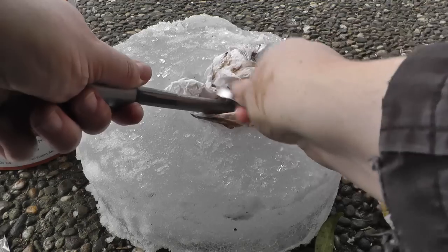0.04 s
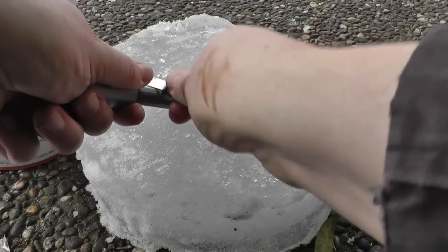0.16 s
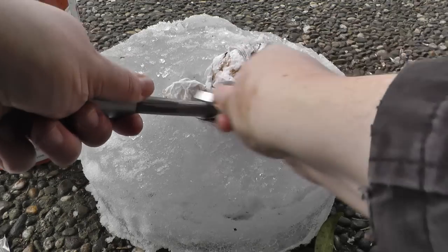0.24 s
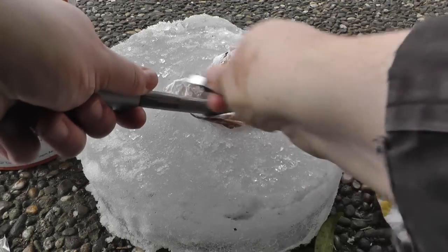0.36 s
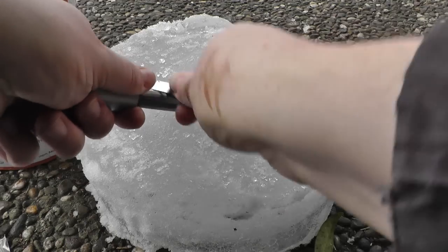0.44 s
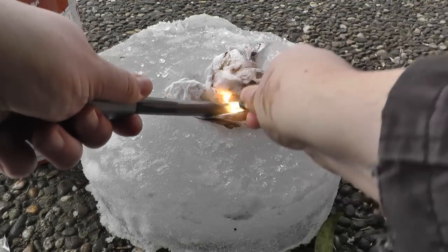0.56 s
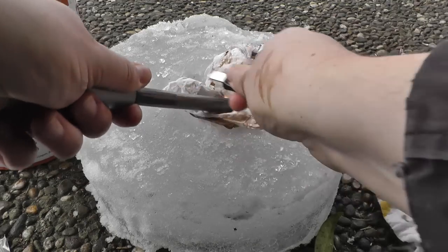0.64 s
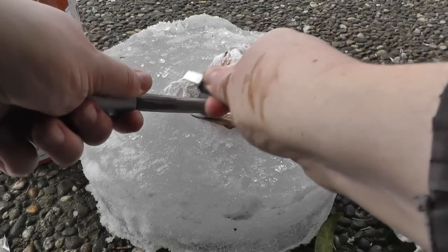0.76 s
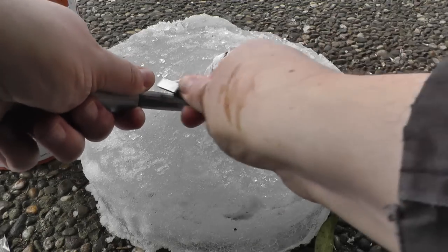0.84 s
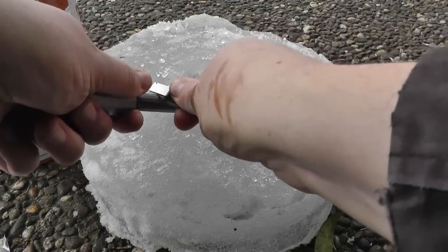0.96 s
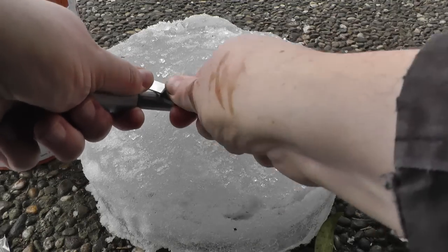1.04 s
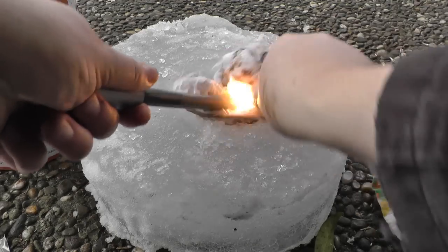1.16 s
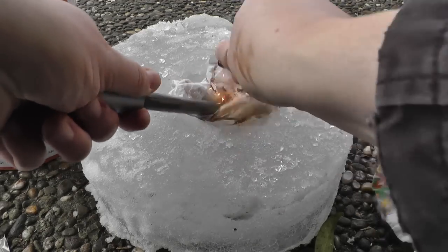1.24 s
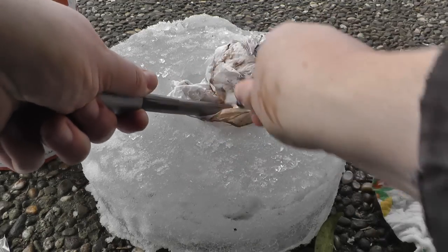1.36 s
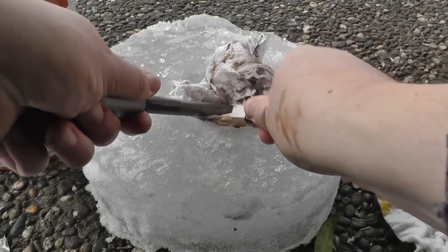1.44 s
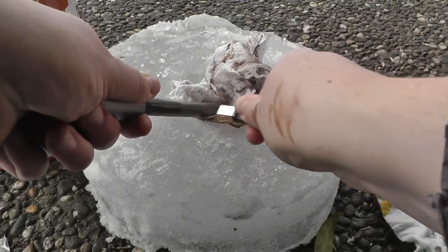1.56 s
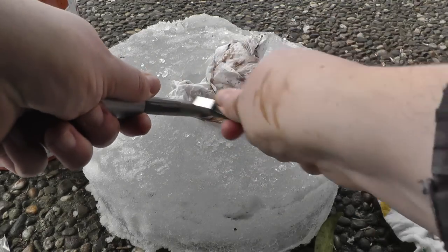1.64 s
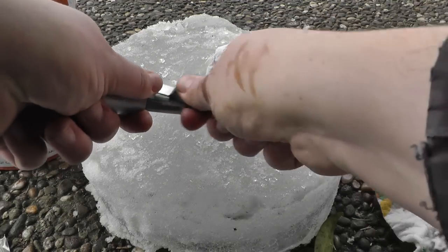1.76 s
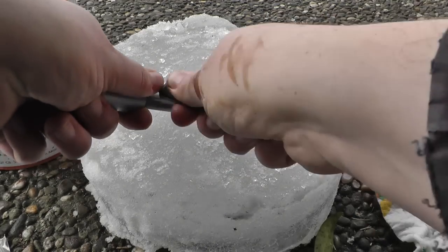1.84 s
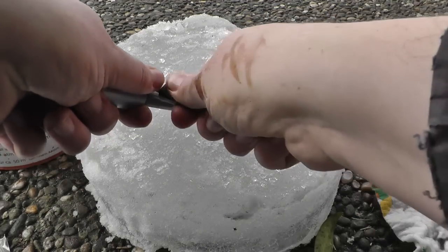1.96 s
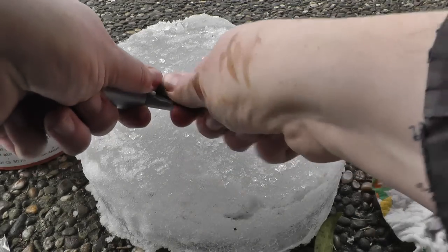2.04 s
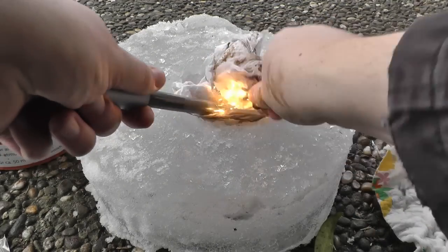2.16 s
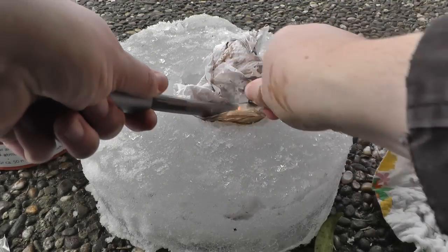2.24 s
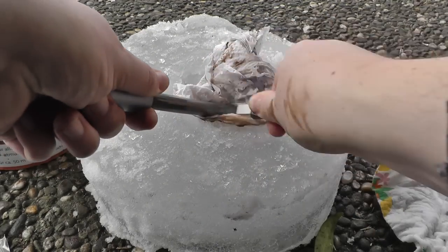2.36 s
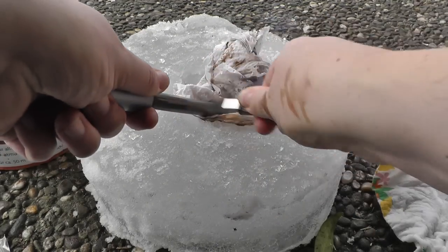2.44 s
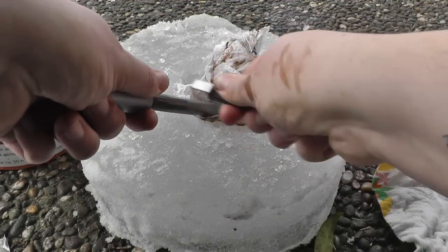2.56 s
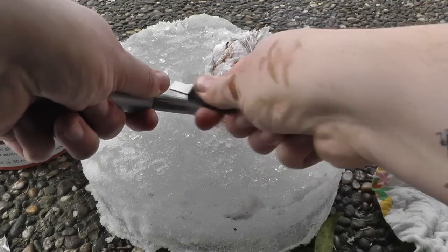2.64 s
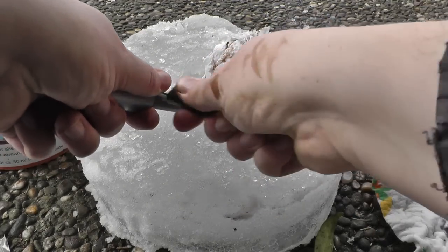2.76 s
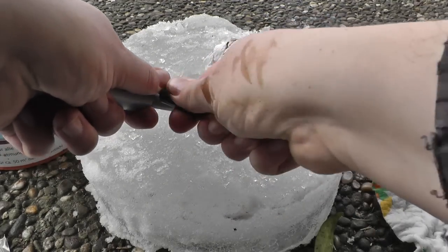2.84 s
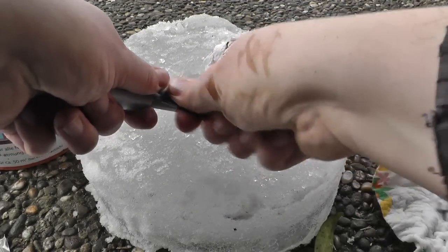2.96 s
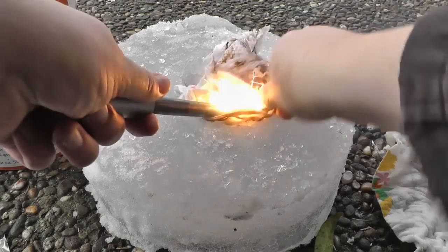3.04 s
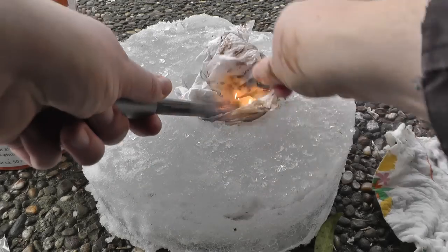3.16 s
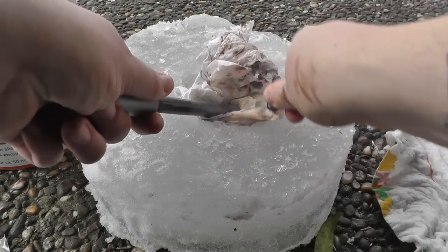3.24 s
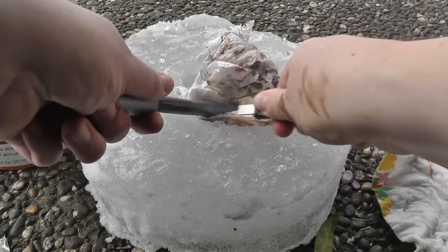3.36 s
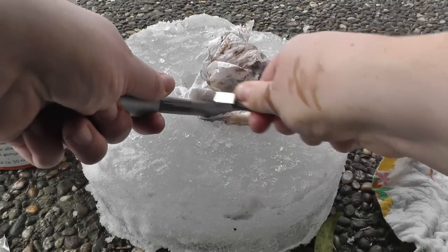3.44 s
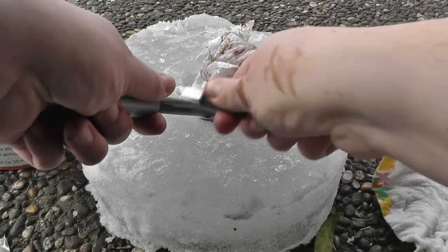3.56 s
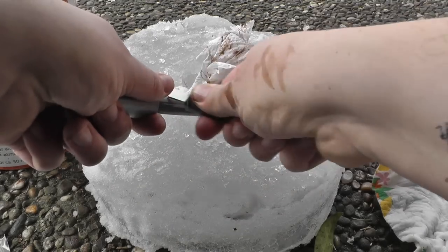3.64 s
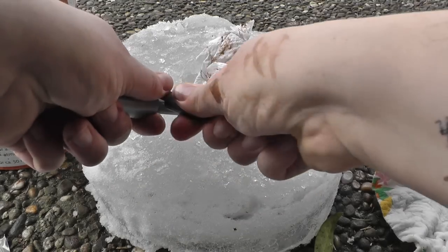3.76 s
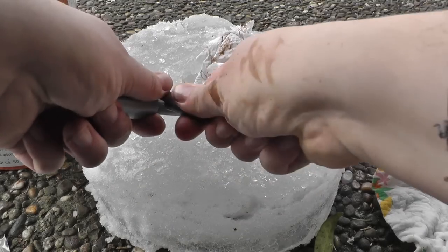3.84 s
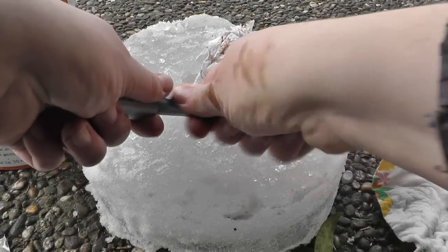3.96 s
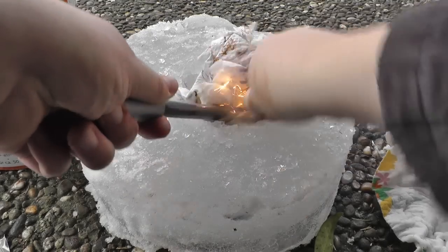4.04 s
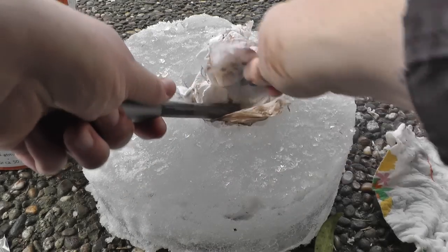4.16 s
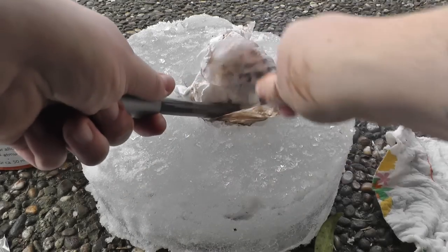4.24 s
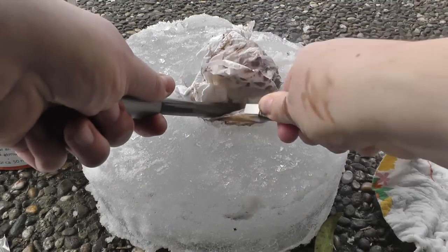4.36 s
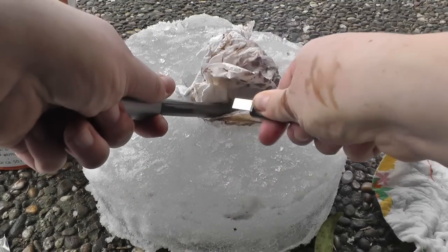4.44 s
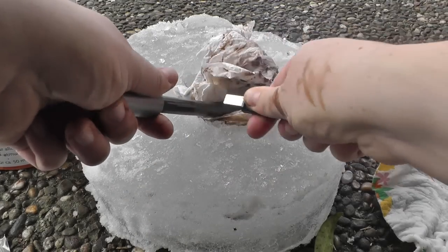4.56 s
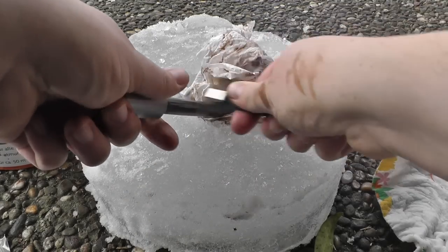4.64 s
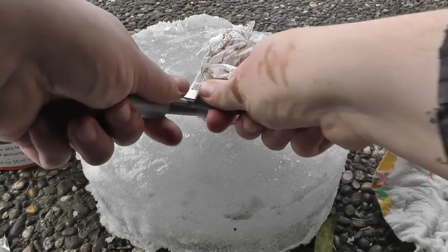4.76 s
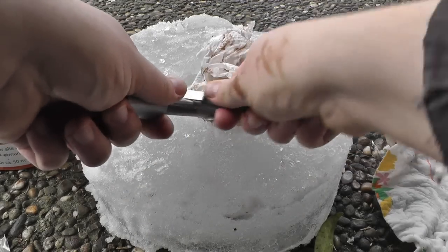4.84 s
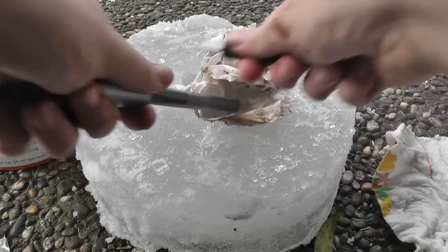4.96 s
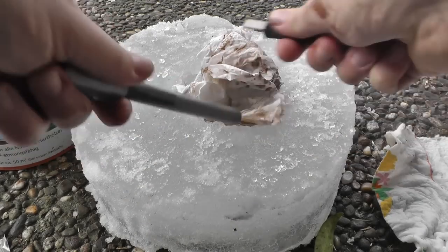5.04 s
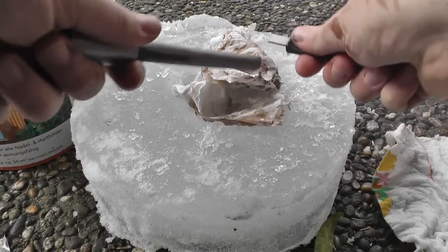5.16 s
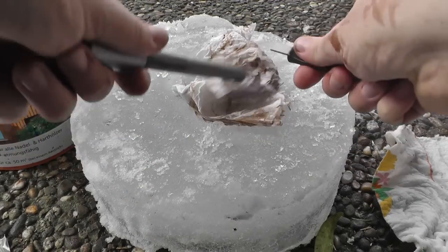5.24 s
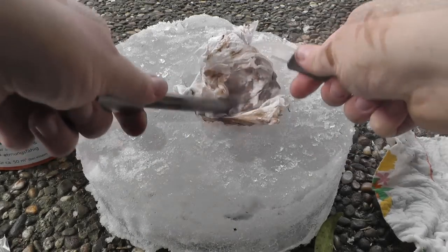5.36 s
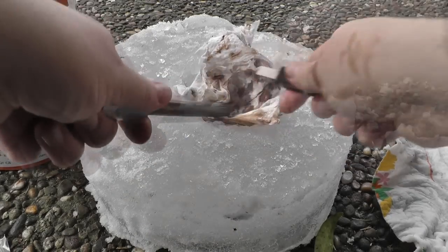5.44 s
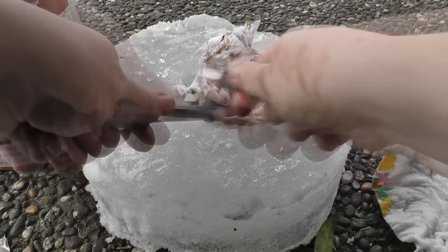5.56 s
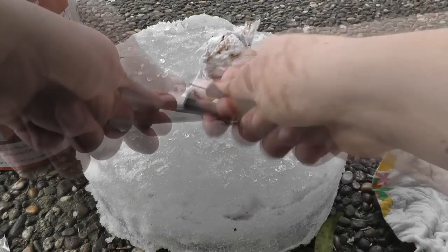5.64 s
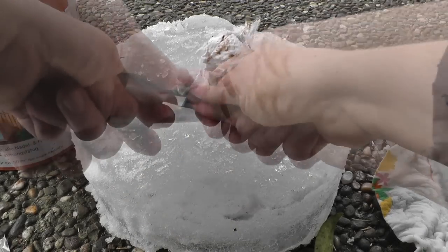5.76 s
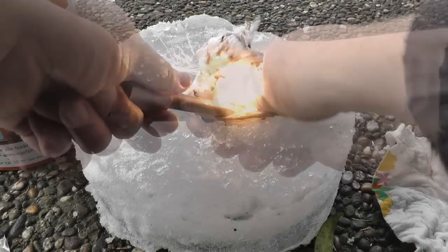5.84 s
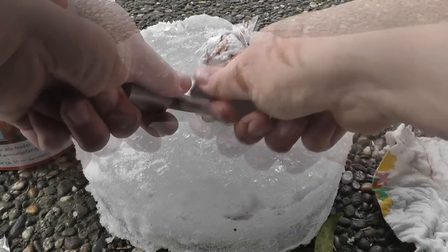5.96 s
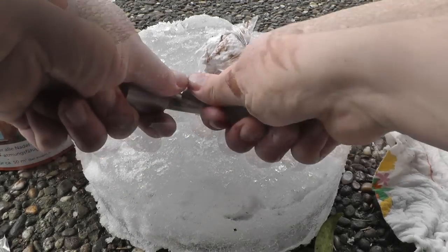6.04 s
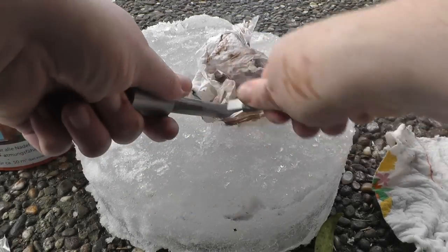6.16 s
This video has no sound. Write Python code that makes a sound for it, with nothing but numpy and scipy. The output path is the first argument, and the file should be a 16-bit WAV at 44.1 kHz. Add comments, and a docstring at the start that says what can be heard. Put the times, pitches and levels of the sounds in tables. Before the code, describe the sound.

Steel striker rasps along a fire-steel rod close by: three light scrapes, then four harsh ones with spark bursts, then a dull knock and sleeve rustle.

```python
"""Outdoors and close by, a steel striker is drawn along a fire-steel rod over tinder.
Friction makes the rasp: three light strokes, then four hard ones, the first followed by a faint second
contact at the rod's tip. Contacts tick and ring the steel as damped modes, and the skating edge squeals by
stick-slip. Shavings flare as filtered noise full of bursts, and sparks pop as impulses. Late on, the rod's
tip knocks on the block below; sleeves rustle and swish as shaped noise over a low outdoor wash."""
import sys
import numpy as np
from scipy import signal
from scipy.fft import rfft, irfft
from scipy.io import wavfile
from scipy.ndimage import uniform_filter1d

SR = 44100
rng = np.random.default_rng(int(sys.argv[2]) if len(sys.argv) > 2 else 0)


def log_audio(samples):
    """Write samples as a 16-bit WAV file to the path given in sys.argv[1]."""
    # one column per channel
    frames = np.atleast_2d(samples).T
    # limit to full scale, then quantise
    limited = np.clip(frames, -1, 1)
    pcm = np.round(limited * 32767).astype(np.int16)
    wavfile.write(sys.argv[1], SR, pcm)


N = 273420
TIME = np.arange(N) / SR


def amp(db):
    """Decibel law: level to amplitude gain."""
    return 10 ** (np.asarray(db) / 20)


def unit(x):
    """Power normalization: scales to rms 1."""
    return x / np.sqrt(np.mean(x ** 2) + 1e-20)


def peaked(x, db):
    """Peak normalization: scales the largest excursion to a level."""
    return amp(db) * x / abs(x).max()


def read(points, hz):
    """Interpolation of a (frequency_hz, value) table on a logarithmic frequency axis."""
    table_hz, value = np.transpose(points)
    return np.interp(np.log(hz + 1), np.log(table_hz + 1), value)


def add(mix, start_s, sound):
    """Superposition: adds a sound into the mix from a start time."""
    part = mix[max(round(start_s * SR), 0):][:len(sound)]
    part += sound[:len(part)]


def level(rows, shape):
    """Superposed envelopes: each row starts one of the given shape, cut off after 1 s."""
    out = np.zeros(N)
    for start_s, *settings in rows:
        add(out, start_s, shape(TIME[:SR], *settings))
    return out


def band(x, lo_hz, hi_hz):
    """Causal band-pass filtering."""
    edges_hz = [lo_hz, min(hi_hz, SR / 2 - 1)]
    return signal.sosfilt(signal.butter(2, edges_hz, "band", fs=SR, output="sos"), x)


def unit_in(x, lo_hz, hi_hz):
    """Band-power normalization: scales so that one band has rms 1."""
    return x / band(x, lo_hz, hi_hz).std()


def colour(x, spectrum, size=2048):
    """Minimum-phase filtering: energy comes as early as possible, so clicks keep sharp fronts."""
    hz = abs(np.fft.fftfreq(size, 1 / SR))
    log_gain = np.log(amp(read(spectrum, hz)))
    kernel = np.fft.ifft(np.exp(np.conj(signal.hilbert(log_gain)))).real
    return signal.oaconvolve(x, kernel)[:len(x)]


def wander(rate_hz):
    """Low-passed noise: a smooth random modulator of rms 1."""
    hz = np.fft.rfftfreq(N, 1 / SR)
    return unit(irfft(rfft(rng.standard_normal(N)) / (1 + (hz / rate_hz) ** 4), N))


def grains(per_s, spread_db):
    """Random impulse train (shot noise): mostly small clicks, a few large."""
    size = amp(spread_db * np.minimum(rng.exponential(1, N), 4))
    sign = rng.choice([-1, 1], N)
    return unit(size * sign * (rng.random(N) < per_s / SR))


def ring(modes, size=4096):
    """Modal superposition: a struck body responds as a sum of decaying sines."""
    t = TIME[:size]
    return sum(amp(db - 60 * t / t60) * np.sin(2 * np.pi * hz * t) for hz, db, t60 in modes)


def patchy(x, depth_db, size=256):
    """Time-varying spectrum: other frequencies stand out every few ms, as chips of different size break off."""
    spectra = signal.stft(x, nperseg=size)[2]
    patches = uniform_filter1d(rng.standard_normal(spectra.shape), 4, axis=0)  # over frequency
    patches = uniform_filter1d(patches, 3, axis=1)  # over time
    return signal.istft(spectra * amp(depth_db * unit(patches)), nperseg=size)[1][:N]


CONTACT_S = 0.0034  # the edge takes this long to grip, and shavings to catch


def press(t, build_s, hold_s, db, from_db, fade_db_per_s):
    """Contact envelope: grips, builds from from_db relative to db, holds, and decays exponentially."""
    build = from_db * np.maximum(1 - t / build_s, 0)
    fade = fade_db_per_s * np.maximum(t - build_s - hold_s, 0)
    return np.minimum(t / CONTACT_S, 1) * amp(db + build - fade)


# modes of rod and striker, damped by the hands: frequency_hz, level_db, t60_s
STEEL_MODES = [(1268, -18, 0.026), (2520, -53, 0.0084), (2890, -11.5, 0.014), (3450, -5, 0.014),
               (5000, -1, 0.0062), (6320, -17, 0.018), (6585, 5.5, 0.0085), (7055, -1.5, 0.011),
               (7420, -10, 0.012), (9600, -30, 0.0064)]


def rasp(pressure, spectrum, gain_db, ring_db, judder_db, patch_db, spread_db):
    """Friction noise: uneven slips tear tiny chips off the rod, sound directly and ring the steel."""
    chips = patchy(grains(11000, spread_db), patch_db) * amp(judder_db * wander(240))
    steel = signal.oaconvolve(chips, ring(STEEL_MODES))[:N]
    sound = unit(colour(chips, spectrum)) + amp(ring_db) * unit(steel)
    return amp(gain_db) * pressure * unit_in(sound, 5000, 10000)


# light strokes along the rod: start_s, build_s, hold_s, level_db (before the rasp's gain)
LIGHT_STROKES = [(0.003, 0.038, 0.079, -32.5), (.287, 0.036, 0.088, -32), (.567, 0.067, 0.049, -29)]
# spectrum of the light rasp, also of tick cracks and bite grit: frequency_hz, level_db
RASP_SPECTRUM = [(100, -28), (600, -19), (1150, -12.5), (2250, -18), (2600, -2.5), (3300, -4.5), (3600, -9),
                 (5100, -9), (5450, 1.5), (6300, -3), (7800, -2), (9000, -10.5), (10200, -10.5),
                 (11000, -19.5)]


def light_strokes():
    """Sustained friction: pressure builds and is held until the edge lifts."""
    def stroke(t, build_s, hold_s, db):
        """Pressure envelope: the first touch is 13 dB below full pressure."""
        return press(t, build_s, hold_s, db, from_db=-13, fade_db_per_s=563)

    return rasp(level(LIGHT_STROKES, stroke), RASP_SPECTRUM,
                gain_db=-2.0, ring_db=-8.0, judder_db=2.5, patch_db=3.0, spread_db=4.0)


# four hard strokes down the rod; the second row is the first stroke's faint second contact at the tip:
# start_s, build_s, level_db (before the rasp's gain), fade_db_per_s
HARD_STROKES = [(1.206, 0.035, -22.5, 328), (1.31, 0.034, -34.5, 802), (2.18, 0.046, -24, 350),
                (3.097, 0.032, -22.5, 320), (4.089, .038, -23.5, 560)]
# spectrum of the hard rasp, also of slide grit and knock clicks: frequency_hz, level_db
GOUGE_SPECTRUM = [(100, -15), (700, -18), (2100, -13.5), (3100, 2), (3900, -6), (5000, -2), (5800, -1),
                  (7500, -1), (9000, -7.5), (10200, -9.5), (11500, -17), (16000, -14)]


def hard_strokes():
    """Abrasive friction: at each contact the edge digs in fast and runs off the rod at once."""
    def contact(t, build_s, db, fade_db_per_s):
        """Pressure envelope: the first touch is 13.5 dB below full pressure."""
        return press(t, build_s, 0, db, -13.5, fade_db_per_s)

    return rasp(level(HARD_STROKES, contact), GOUGE_SPECTRUM,
                gain_db=-2.0, ring_db=-13.5, judder_db=0.7, patch_db=2.5, spread_db=4.0)


# the striker slides lightly into place: start_s, length_s, level_db (before gain_db), change_db along the slide
SLIDES = [(.152, .008, -49, 2), (.44, 0.0082, -47, -2), (.778, 0.022, -43.5, 2), (1.01, .055, -55, -8),
          (1.135, 0.037, -49.5, 6), (1.563, 0.058, -56, -1), (1.905, 0.01, -46, -11), (2.0, .05, -54, -9),
          (2.138, 0.013, -48.5, -5), (2.838, 0.057, -51.5, 5), (2.902, 0.01, -44.5, 3),
          (3.72, 0.08, -49.5, -6), (3.862, 0.0054, -45.5, 9), (4.558, 0.02, -51, -2),
          (4.9, 0.075, -52.5, 1), (5.788, 0.065, -47.5, -8), (5.918, 0.044, -45, 7.5)]


def slides(gain_db=-1, grit_db=-3, judder_db=2.8, low_db=5):
    """Lightly loaded resonator: barely pressed, the striker rings freely, above all in its low modes."""
    def touch_level(t, length_s, db, change_db):
        """Linear decibel ramp: the touch grows or eases steadily, then lifts."""
        return press(t, length_s, 0, db + change_db / 2, -change_db, fade_db_per_s=750)

    touch = grains(11000, 1.4) * amp(judder_db * wander(170))
    weight = [(3400, low_db), (5800, 0)]  # frequency_hz, level_db
    free_modes = [(hz, db + read(weight, hz), t60) for hz, db, t60 in STEEL_MODES]
    steel = signal.oaconvolve(touch, ring(free_modes))[:N]
    grit = unit(colour(touch, GOUGE_SPECTRUM))
    return amp(gain_db) * level(SLIDES, touch_level) * unit(unit(steel) + amp(grit_db) * grit)


# steel meets rod: start_s, peak_db, low_modes_db, top_modes_db, grip_ratio (factor on mode frequencies)
TICKS = [(0.2781, -13.5, 0, 6, 0.95), (.558, -7.5, -6, 23.5, 0.96), (1.0046, -17.5, 1, -20, 0.95),
         (1.9928, -19, -3.5, 1.5, 0.96), (2.8346, -21.5, 3.5, 26, 0.95), (3.7151, -24, 7, 4, 0.95),
         (3.868, -28, 4.5, -7, 0.84), (4.8257, -20.5, -11.5, -7, 1), (4.83, -26, -14, -7, 1.03),
         (4.838, -28.5, -16, -10, 1), (4.8871, -21, -3, -9, 0.97), (5.7834, -13, 6, 20, 0.94),
         (5.9276, -26.5, 3, 1, 0.99)]


def ticks(crack_db=-13, crack_s=0.0023):
    """Impact excitation: a sharp contact rings the steel; the grip shifts and weights its modes."""
    out = np.zeros(N)
    for start_s, peak_db, low_db, top_db, grip in TICKS:
        weight = [(3400, low_db), (5800, 0), (7000, 0), (10000, top_db)]  # frequency_hz, level_db
        steel = ring([(hz * grip, db + read(weight, hz), t60) for hz, db, t60 in STEEL_MODES])
        t = TIME[:len(steel)]
        steel = steel * (1 - np.exp(-t / 0.00026))  # the contact takes a moment to build
        noise = rng.standard_normal(len(t)) * np.exp(-t / crack_s)
        crack = colour(colour(noise, RASP_SPECTRUM), weight)
        add(out, start_s, peaked(peaked(steel, 0) + peaked(crack, crack_db), peak_db))
    return out


# the edge catches and chatters: start_s, peak_db, length_s, centre_hz
BITES = [(0.349, -18, 0.0033, 6540), (0.64, -24, 0.0021, 6200), (1.23, -10.5, 0.0075, 6670),
         (1.579, -32.5, 0.016, 6170), (2.211, -14, 0.0079, 6560), (3.1234, -12, .005, 5200),
         (3.854, -27.5, 0.00094, 5440), (4.118, -12.5, 0.0049, 4970), (4.833, -35, 0.0061, 6700)]


def bites(width_ratio=1.15, grit_db=-10, size=2048):
    """Frictional chatter: the edge digs in for milliseconds, a narrow-band noise burst with grit."""
    out, t = np.zeros(N), TIME[:size]
    for start_s, peak_db, length_s, hz in BITES:
        slips = rng.standard_normal(size) * np.exp(-(t / length_s) ** 4)
        chatter = unit(band(slips, hz / width_ratio, hz * width_ratio))
        grit = unit(colour(slips, RASP_SPECTRUM))
        add(out, start_s, peaked(chatter + amp(grit_db) * grit, peak_db))
    return out


# the edge squeals as it skates on the rod: start_s, length_s, level_db (before gain_db), first_hz, last_hz
SQUEALS = [(.01, .06, -31, 6360, 6580), (0.303, 0.049, -40, 6880, 7300), (.373, .022, -33, 6400, 6300),
           (.562, 0.11, -39, 6350, 6150), (1.062, 0.063, -53.5, 6700, 4550),
           (1.213, .017, -26.5, 7030, 7000), (4.075, .03, -45, 6800, 6700)]


def squeals(width_hz=420, gain_db=-1, flutter_db=3):
    """Stick-slip: a rough whistle that keeps breaking up and glides with the speed of the edge."""
    def arch(t, length_s, db):
        """Half-sine envelope: swells and dies evenly."""
        return amp(db) * np.sin(np.pi * np.minimum(t / length_s, 1))

    out = np.zeros(N)
    drive = (wander(width_hz) + 1j * wander(width_hz)) * amp(flutter_db * wander(159))
    for start_s, length_s, db, first_hz, last_hz in SQUEALS:
        glide_hz = np.interp(TIME, [start_s, start_s + length_s], [first_hz, last_hz])
        carrier = np.exp(2j * np.pi * np.cumsum(glide_hz) / SR)
        out += level([(start_s, length_s, db)], arch) * unit((drive * carrier).real)
    return amp(gain_db) * out


# modes of the space between hands, block and ground: frequency_hz, level_db, t60_s
NOOK_MODES = [(133, 0.5, 0.031), (400, -17, 0.033), (680, -2, 0.081), (780, 3, 0.051), (975, 15.5, 0.012),
              (1145, 0, 0.058), (1350, -13, 0.064), (1590, -23, 0.13), (3107, -2, .06)]


def nook(x, ring_db=-10):
    """Cavity resonance: adds the short, hollow ring of the space around the tinder."""
    hollow = signal.oaconvolve(x, ring(NOOK_MODES))[:N]
    return x + amp(ring_db) * x.std() * unit(hollow)


# a shower of shavings catches fire: start_s, swell_s, level_db (before gain_db), fade_db_per_s
FLARES = [(.385, 0.011, -41, 300), (.644, 0.0057, -31, 215), (1.207, 0.0055, -33, 750),
          (1.252, 0.012, -27, 178), (1.33, 0.0072, -37, 600), (2.219, 0.033, -24.5, 500),
          (3.127, 0.027, -24.5, 265), (4.123, 0.027, -24.5, 560)]
# spectrum of the burning shavings: frequency_hz, level_db
FLARE_SPECTRUM = [(40, -28), (130, -3), (450, -4.5), (700, -3.5), (900, -5.5), (1600, 1), (2100, -10.5),
                  (3100, -2), (3900, -7), (5600, -5.5), (8000, -10.5), (11500, -23.5), (16000, -33)]


def flares(gain_db=-0.5, crackle_db=-2, flutter_db=1.1, patch_db=2, dull_db=-4, full_db=-28):
    """Combustion noise: shavings ignite in a puff full of tiny bursts; the dying shower is duller."""
    def burn(t, swell_s, db, fade_db_per_s):
        """Two-rate decay: a flare swells and collapses; its embers, 16 dB lower, fade at 130 dB per s."""
        flame = press(t, swell_s, 0, db, -6, fade_db_per_s)
        embers = press(t, swell_s, 0, db - 16, -6, 130)
        return np.maximum(flame, embers)

    def kindle(t, build_s, db, fade_db_per_s):
        """Plateau and decay: stray sparks fly for 49 ms from a hard contact's start, then die away."""
        return press(t, 0.049, 0, db - 21.5, 0, fade_db_per_s)

    heat = np.maximum(level(FLARES, burn), level(HARD_STROKES, kindle))
    bursts = rng.standard_normal(N) + amp(crackle_db) * grains(1800, 5.0)
    fire = patchy(bursts * amp(flutter_db * wander(220)), patch_db)
    fire = unit_in(nook(colour(fire, FLARE_SPECTRUM)), 300, 2000)
    body = signal.sosfilt(signal.butter(1, 1500, fs=SR, output="sos"), fire)
    # the treble sinks towards dull_db as heat falls below full_db
    bright = amp(dull_db * (1 - np.minimum(heat / amp(full_db), 1)))
    return amp(gain_db) * heat * (body + bright * (fire - body))


# single sparks and chips burst, or thump into the tinder: start_s, peak_db, body_db (spectrum at 900 Hz)
POPS = [(0.6935, -17, 3), (0.7291, -18.5, -2), (0.7478, -29, -20), (0.888, -22.5, -12), (1.2088, -17.5, 20),
        (1.2963, -25, 12), (1.3472, -22, 14), (1.3861, -15, -14), (1.526, -35.5, 1), (2.2497, -11, 10),
        (2.317, -25, 0), (3.1479, -9.5, 4), (3.1545, -14, 9), (4.1595, -10.5, 9)]


def pops(fizz_db=-15, fizz_s=0.0028, size=2048):
    """Impulsive source: a spark bursts with one sharp push and a brief fizz."""
    out, t = np.zeros(N), TIME[:size]
    for start_s, peak_db, body_db in POPS:
        fizz = rng.standard_normal(size) * np.exp(-t / fizz_s)
        burst = signal.unit_impulse(size) + amp(fizz_db) * fizz
        spectrum = [(100, body_db - 18), (900, body_db), (2100, -6), (6800, -1), (11000, -15)]
        add(out, start_s, peaked(colour(burst, spectrum), peak_db))
    return out


# the rod's tip knocks on the block and bounces: start_s, gain_db
KNOCKS = [(5.1415, -10.5), (5.158, -26.5), (5.172, -25.5), (5.192, -36)]
# modes of the block: frequency_hz, level_db, t60_s
BLOCK_MODES = [(394, 3.5, 0.025), (262, -37, 0.021), (590, -4.5, 0.017), (1160, -23, 0.016)]


def knocks(rise_s=0.0024, click_db=-26):
    """Damped modal impact: dull blows on the block, each with a faint gritty click."""
    out, body = np.zeros(N), ring(BLOCK_MODES)
    t = TIME[:len(body)]
    click = colour(rng.standard_normal(len(t)) * np.exp(-t / 0.0054), GOUGE_SPECTRUM)
    thud = body * (1 - np.exp(-(t / rise_s) ** 2)) + peaked(click, click_db)
    for start_s, db in KNOCKS:
        add(out, start_s, amp(db) * thud)
    return out


def swing(t, rise_s, db, fade_db_per_s):
    """Motion envelope: cloth gathers speed smoothly and comes to rest."""
    rise = np.sin(np.pi / 2 * np.minimum(t / rise_s, 1)) ** 2
    return rise * amp(db - fade_db_per_s * np.maximum(t - rise_s, 0))


# sleeve and hand brush: start_s, rise_s, level_db, fade_db_per_s
RUSTLES = [(2.9, 0.017, -48, 72), (3.412, 0.021, -53.5, 480), (4.372, 0.023, -54, 114),
           (5.35, 0.045, -57.5, 65), (5.417, .004, -50, 900), (5.46, 0.042, -51.5, 252),
           (5.59, 0.031, -57.5, 76), (6.088, 0.013, -61, 478)]
# spectrum of brushing fibres: frequency_hz, level_db
CLOTH_SPECTRUM = [(150, -30), (450, -5), (750, -4), (1100, 2), (1650, -3), (2100, -13.5), (2700, -4.5),
                  (3900, -12.5), (6200, -10), (10000, -24.5), (16000, -43)]


def rustles(flutter_db=-1.5):
    """Fibre friction: the sleeve's fibres brush past each other in many small clicks."""
    cloth = colour(grains(9000, 4.3) * amp(flutter_db * wander(50)), CLOTH_SPECTRUM)
    return level(RUSTLES, swing) * unit_in(cloth, 900, 2000)


# the arm swings, its heavy sleeve swishing low: start_s, rise_s, level_db (before gain_db), fade_db_per_s
SWISHES = [(1.6, 0.16, -50, 45), (4.165, 0.0052, -32, 210), (4.445, 0.03, -51.5, 112),
           (4.8, 0.25, -50.5, 65), (5.33, 0.068, -59.5, 41), (5.52, .2, -48.5, 96)]
# spectrum of the swishing folds: frequency_hz, level_db
SLEEVE_SPECTRUM = [(60, -18), (200, -15.5), (410, 5), (700, -13), (1500, -16.5), (4000, -72), (16000, -64)]


def swishes(gain_db=-1):
    """Low-coloured noise: the sleeve's folds swish as the arm swings."""
    folds = unit(colour(rng.standard_normal(N), SLEEVE_SPECTRUM))
    return amp(gain_db) * level(SWISHES, swing) * folds


def nearby(x, echo_db=-17, echo_s=0.007, size=2048):
    """Early reflections: quick, scattered echoes from the hands and the block."""
    echo = rng.standard_normal(size) * np.exp(-TIME[:size] / echo_s)
    return x + amp(echo_db) * signal.oaconvolve(x, echo / np.linalg.norm(echo))[:N]


# level of the left port against the right: frequency_hz, level_db
PORT_BALANCE = [(60, -1), (500, 1), (1300, -2.5), (3000, 1.5), (6000, -1.5), (9000, 3), (15000, 1)]
# phase lead of the left port against the right: frequency_hz, phase_rad
PORT_PHASE = [(60, 0), (600, 0), (3450, .17), (5600, .15), (8000, .5), (10000, -.2), (15000, 0)]


def ports(x, shade_db=-10):
    """Interchannel difference: two ports differ in level and phase; moving hands shade treble unevenly."""
    hz = np.fft.rfftfreq(N, 1 / SR)
    left = amp(read(PORT_BALANCE, hz) / 2) * np.exp(.5j * read(PORT_PHASE, hz))  # half the difference
    shade = amp(shade_db) * band(x, 8000, 20000) * wander(120)
    return irfft(rfft(x) * np.array([left, 1 / left]), N) + np.array([shade, -shade])


# decay of the surroundings: frequency_hz, t60_s
YARD_DECAY = [(150, 0.13), (1000, 0.39), (5000, 0.28), (14000, 0.14)]


def yard(x, tail_db=-24):
    """Diffuse reverberation: a faint decaying-noise tail, different on each side."""
    hz, t, spectra = signal.stft(rng.standard_normal((2, SR // 2)), SR, nperseg=256)
    decay = amp(-60 * t / read(YARD_DECAY, hz)[:, None])
    tail = signal.istft(spectra * decay, SR, nperseg=256)[1]
    return amp(tail_db) * signal.fftconvolve(x[None], tail / np.linalg.norm(tail[0]), axes=1)[:, :N]


# spectrum of the outdoor background: frequency_hz, level_db
AIR_SPECTRUM = [(25, -20), (60, -3.5), (150, 1.5), (320, -7), (700, -11.5), (1600, -18.5), (2100, -25.5),
                (2850, -17), (3900, -28), (6500, -24.5), (9000, -34.5), (12000, -37.5), (16000, -37.5)]
# left-right likeness of the background: frequency_hz, correlation (1 = identical)
AIR_LIKENESS = [(30, 1), (120, 0.99), (550, 0.83), (1650, 0.38), (5000, 0.97), (15000, 0.13)]


def air(level_db=-52, waver_db=1.56):
    """Partly coherent noise: a low wash with faint hiss, most alike on both sides in the bass."""
    a, b = rfft(rng.standard_normal((2, N)))
    same = np.clip(read(AIR_LIKENESS, np.fft.rfftfreq(N, 1 / SR)), -1, 1)
    sides = irfft([a, same * a + np.sqrt(1 - same ** 2) * b], N)
    wash = np.array([unit_in(colour(side, AIR_SPECTRUM), 100, 1000) for side in sides])
    return wash * amp(level_db + waver_db * wander(15.0))


def scene():
    """Superposition: all the handwork sounds from one spot, then its tail and the background join."""
    striker = light_strokes() + hard_strokes() + slides() + ticks() + bites() + squeals()
    work = nearby(striker + flares() + pops() + knocks() + rustles() + swishes())
    return ports(work) + yard(work) + air()


def record(dry):
    """Band limiting: a linear-phase low-pass at 15.9 kHz."""
    lowpass = signal.firwin(301, 15900, window=("kaiser", 8), fs=SR)
    return signal.oaconvolve(dry, lowpass[None], "same")


dry = scene()
out = record(dry)
log_audio(out)
```